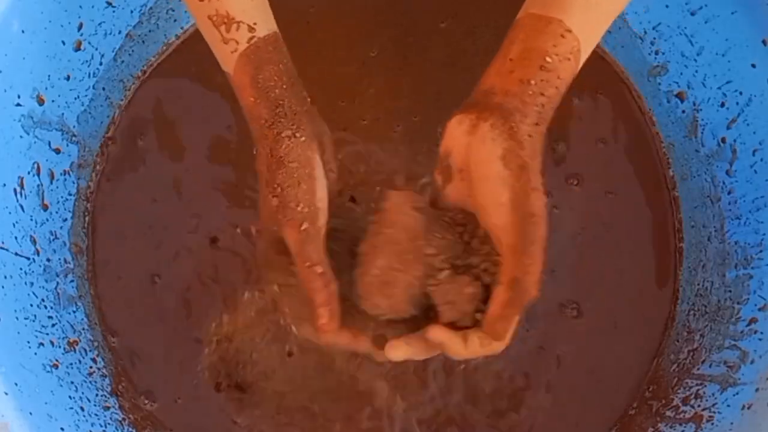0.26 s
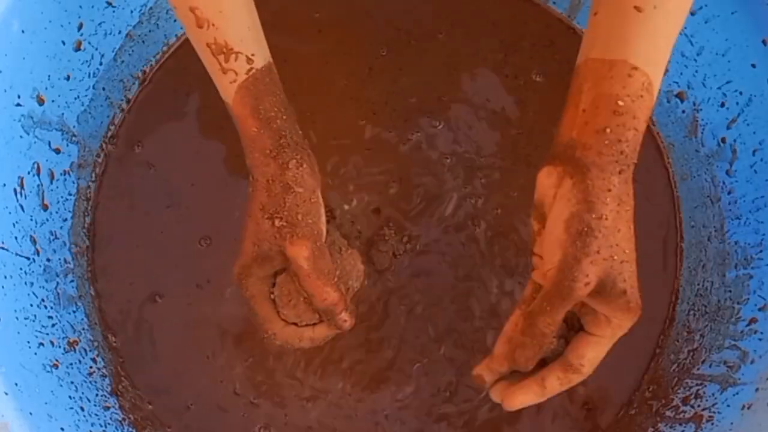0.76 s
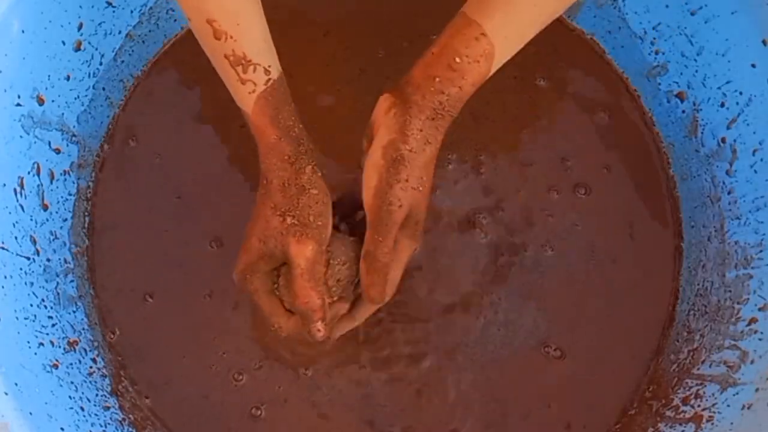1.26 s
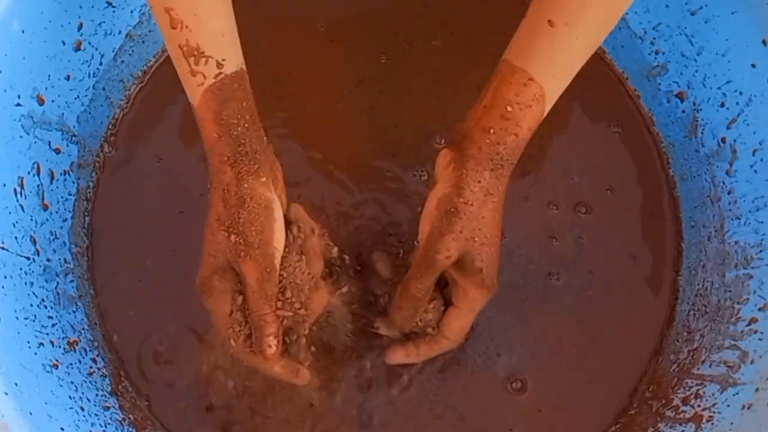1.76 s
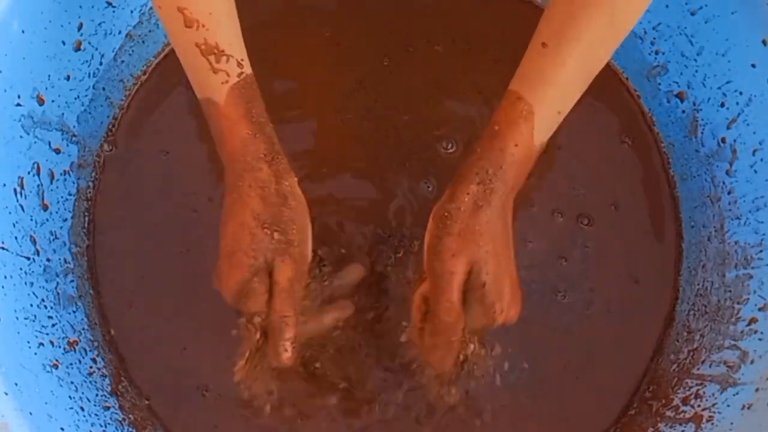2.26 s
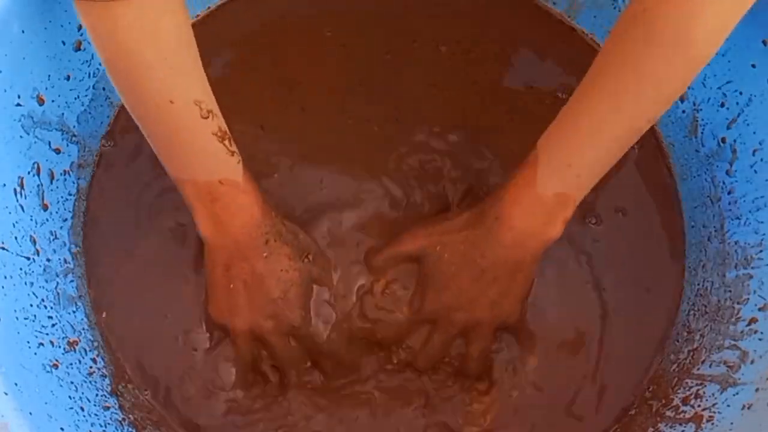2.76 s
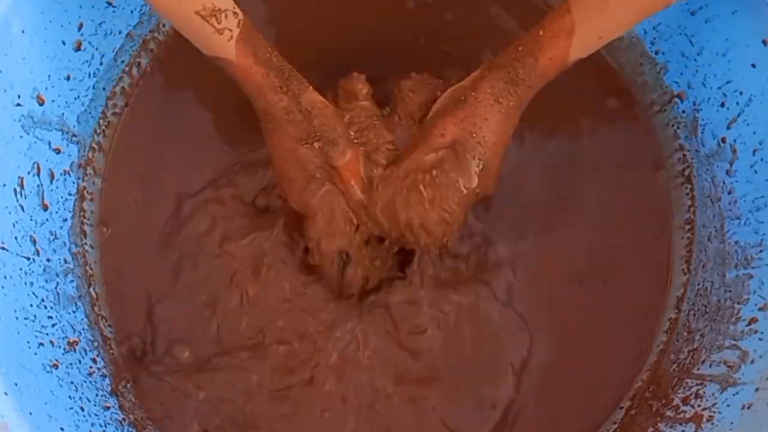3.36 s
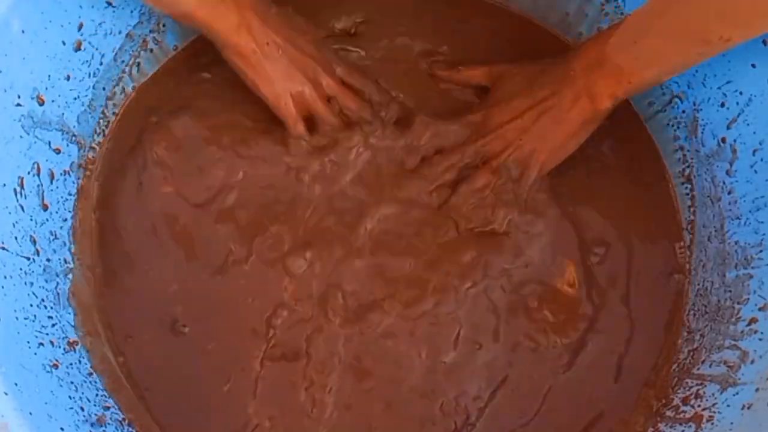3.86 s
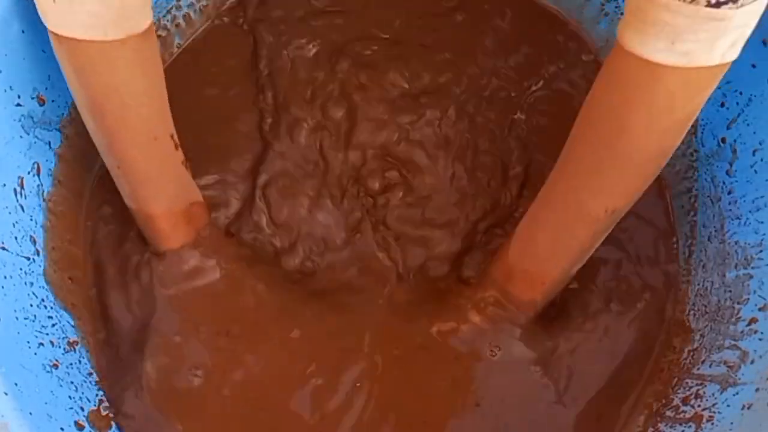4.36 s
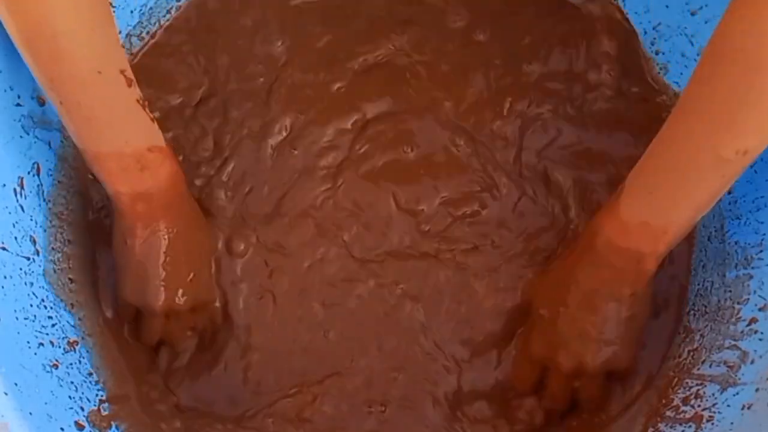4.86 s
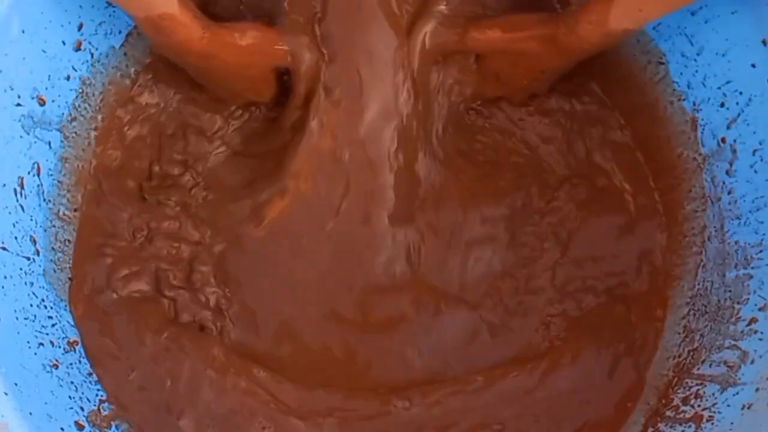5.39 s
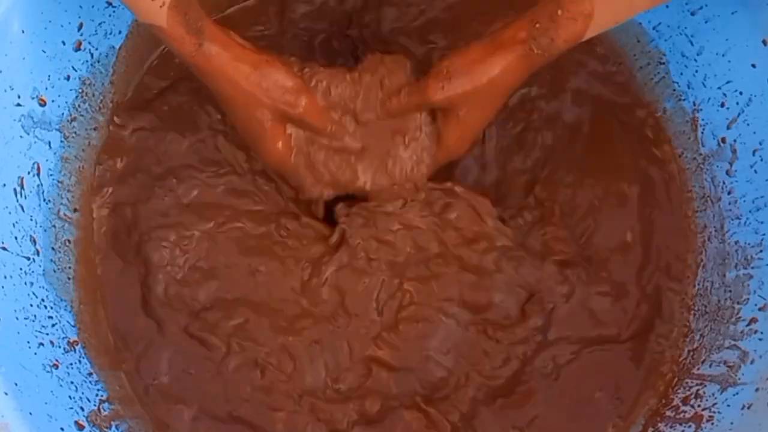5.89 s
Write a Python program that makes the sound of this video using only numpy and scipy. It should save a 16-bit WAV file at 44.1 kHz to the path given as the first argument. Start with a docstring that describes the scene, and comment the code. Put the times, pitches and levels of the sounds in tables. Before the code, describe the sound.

Sparse wet crackling and tiny droplets plopping come first, dry and near to the microphone, over faint low room rumble. A muddy swish grows into a short bubbling surge as hands scoop, then squelchy squirts and drips. Next comes a broad, heavy slosh with low rubbing on the basin floor and sandy scraping up the wall. It ends in thick gurgling splashes, spray and crunchy squeezed grit.

```python
"""Wet grit crackles and crumbs plop as hands crumble soaked clay over a basin of muddy water, close by.
The hands rake the sediment along the bottom, lift and squeeze a handful, rake again and pour slurry back.
Water is made of ringing air pockets, grit of tiny noise bursts, the basin of damped resonances;
movements shape their levels. A quiet room rumbles behind and answers faintly."""
import sys
import numpy as np
from scipy import signal
from scipy.fft import rfft, irfft, next_fast_len
from scipy.io import wavfile
from scipy.ndimage import map_coordinates

SR = 44100
rng = np.random.default_rng(int(sys.argv[2]) if len(sys.argv) > 2 else 0)


def output_pcm(signal):
    """Save a mono or channel-first signal as 16-bit PCM at the path in sys.argv[1].

    Samples are clipped to [-1, 1] before scaling.
    """
    pcm = np.clip(np.atleast_2d(signal).T, -1, 1) * 32767
    wavfile.write(sys.argv[1], SR, np.round(pcm).astype(np.int16))


N = 270333  # length in samples
TOP_HZ = 15900  # band limit

# spread of pitches of the small air pockets under crumbs and froth: (frequency [Hz], relative level [dB])
CRUMB_PITCHES = [(500, -9), (1050, 0.5), (2100, -0.5), (3300, -3.5), (6000, -24)]
# spread of pitches of the larger gulped air pockets: (frequency [Hz], relative level [dB])
GURGLE_PITCHES = [(280, -5), (500, 0), (950, -1), (2300, -7.5), (4200, -21)]
# spectrum of wet grit: (frequency [Hz], relative level [dB])
GRIT_COLOUR = [(500, 2), (1500, 4.5), (3500, 4.5), (7500, 0), (13000, 3.5), (16000, -1)]


def amp(db):
    """Decibels to gain."""
    return 10 ** (np.asarray(db) / 20)


def unit(x):
    """Scale to rms 1."""
    return x / np.sqrt(np.mean(x ** 2) + 1e-20)


def along(points, hz):
    """Join (Hz, dB) points on a log axis, falling another 20 dB an octave outside them."""
    point_hz, db = np.transpose(points)
    octave, known = np.log2(hz + 1), np.log2(point_hz)
    outside = np.abs(octave - np.clip(octave, known[0], known[-1]))
    return np.interp(octave, known, db) - 20 * outside


def wobble(rate):
    """A random curve of straight lines between knots, rate knots a second."""
    knots = rng.standard_normal(4096)
    return map_coordinates(knots, [np.arange(N) * rate / SR], order=1, mode="wrap")


def filtered(x, response):
    """Multiply the spectrum of x by a response of frequency."""
    m = next_fast_len(N + 8192)  # padded so that tails do not wrap round
    return irfft(rfft(x, m) * response(np.fft.rfftfreq(m, 1 / SR)), m)[:N]


def coloured(x, spectrum):
    """Filter x by the given spectrum and scale to rms 1."""
    return unit(filtered(x, lambda hz: amp(along(spectrum, hz))))


def low_cut(x, hz):
    """Weaken what lies below hz."""
    return signal.sosfilt(signal.butter(2, hz, "highpass", fs=SR, output="sos"), x)


def add(track, s, sound):
    """Mix a sound into the track at time s."""
    start = int(np.clip(round(s * SR), 0, N - 1))
    track[start:start + len(sound)] += sound[:N - start]


def scattered(when, sounds):
    """Sum short sounds that start at the given shares of the scene."""
    samples = (when * N).astype(int) + np.arange(sounds.shape[1])
    return np.bincount(samples.ravel(), sounds.ravel(), N)[:N]


def gestures(rows, attack_s, release_s, growth_db=0):
    """Each movement sets in, holds while it grows by growth_db a second, then dies away."""
    t, power = np.arange(N) / SR, np.zeros(N)
    for s, length, db in rows:
        age = np.maximum(t - s, 0)
        held = np.minimum(age, length)
        attack = 1 - np.exp(-age / attack_s)
        release = np.exp((held - age) / release_s)
        power += (amp(db + growth_db * held) * attack * release) ** 2
    return np.sqrt(power)


def swell(peak_s, db, rise_s, fall_s):
    """A bell of gain with its own rise and fall."""
    t = np.arange(N) / SR - peak_s
    return amp(db) * np.exp(-(t / np.where(t < 0, rise_s, fall_s)) ** 2)


def swells(rows):
    """Several bells of gain, summed in power."""
    return np.sqrt(sum(swell(*row) ** 2 for row in rows))


def crackle(count, size_db, clump_db, clump_rate, blur_db):
    """Tiny bursts of uneven size and colour, in clumps, over the blur of countless smaller ones."""
    decay_s, tint_db = 0.00043, 6  # life of a burst; how far it favours its own bands
    when, size, tint = rng.random((count, 3)).T[:, :, None]
    k = np.arange(SR // 900)
    bursts = rfft(np.exp(-k / SR / decay_s) * rng.standard_normal((count, len(k))))
    band = np.sqrt(np.linspace(0, 2, bursts.shape[1]))
    level_db = tint_db * np.cos(2 * np.pi * (band + tint)) - size_db * np.log(size + .015)
    grains = scattered(when, irfft(bursts * amp(level_db), len(k)))
    blur = amp(blur_db) * rng.standard_normal(N)
    return (unit(grains) + blur) * amp(clump_db * wobble(clump_rate))


def pocket(t, hz, cycles, rise, onset):
    """An air pocket swells over onset cycles and rings for a few more; its pitch rises as it nears the surface."""
    age = t * hz / cycles  # in decay times
    attack = 1 - np.exp(-t * hz / onset)
    ringing = np.sin(2 * np.pi * hz * t * (1 + rise * np.minimum(age, 10) / 2))
    return attack * np.exp(-age) * ringing


def bubbles(spectrum, count, cycles, rise, size_db):
    """A stream of ringing air pockets whose pitches are spread as the spectrum says, at rms 1."""
    when, pick, size, sign = rng.random((count, 4)).T[:, :, None]
    grid = np.arange(150, 8000)  # Hz
    share = np.cumsum(grid * amp(along(spectrum, grid)) ** 2)  # favours the small, high pockets
    hz = np.interp(pick, share / share[-1], grid)
    t = np.arange(SR // 70) / SR
    sizes = amp(-size_db * np.log(size + .04)) * np.sign(sign - .5)
    return unit(scattered(when, sizes * pocket(t, hz, cycles, rise, onset=0.26)))


def resonance(f, hz, width):
    """Response of one damped mode, 1 at its centre."""
    return 1j * f * width / (hz * hz - f * f + 1j * f * width)


def sloshed(x, response):
    """Crossfade x through three tunings of its resonances: their pitch wanders as the water sloshes."""
    shift, sloshes_per_s = .07, 9  # shift as a share of the pitch
    depth = np.clip(wobble(sloshes_per_s), -1, 1)
    total = np.zeros(N)
    for k in (-1, 0, 1):
        tuned = filtered(x, lambda f: response(f * (1 + shift) ** k))
        total += np.maximum(1 - np.abs(depth - k), 0) * tuned
    return unit(total)


def rumbling():
    """The steady noise of the quiet room."""
    # spectrum of the room noise: (frequency [Hz], relative level [dB])
    room_colour = [(25, -6), (65, 5.5), (140, 9.5), (300, -1.5), (800, -12.5), (3000, -23), (8000, -27.5),
                   (13000, -25.5)]
    return amp(-47) * coloured(rng.standard_normal(N), room_colour)


def room(x):
    """The faint, short answer of the room: a decaying noise tail, drawn afresh every eighth of a second."""
    t, wet, hop = np.arange(SR // 5) / SR, np.zeros(N), SR // 8
    for start in range(0, N, hop):
        tail = rng.standard_normal(len(t)) * amp(-60 * t / 0.081) * (t > .003)
        tail /= np.linalg.norm(tail)
        add(wet, start / SR, signal.fftconvolve(x[start:start + hop], tail))
    return filtered(wet, lambda hz: 1 / (1 + 1j * hz / 4000))  # duller above 4 kHz


def hollow(x):
    """Standing waves in the air over the water boost or thin their own bands."""
    # modes of the air in the basin: (frequency [Hz], width [Hz], gain at the centre [dB])
    air_modes = [(215, 62, -3.5), (484, 62, 1.5), (627, 136, -6), (860, 120, 1)]

    def response(f):
        return np.prod([1 + (amp(db) - 1) * resonance(f, hz, width) for hz, width, db in air_modes], axis=0)
    return filtered(x, response)


def scraping():
    """Hands dragged up the side ring the thinner wall; sand hisses through the shallow water."""
    # sand caught between hand and wall: (peak time [s], relative level [dB], rise [s], fall [s])
    sand_rubs = [(3.535, -38, 0.14, 0.04), (4.945, -34, 0.079, 0.033), (5.075, -32, 0.091, 0.087),
                 (5.15, -41.5, .65, 0.38)]
    # spectrum of the sand's hiss: (frequency [Hz], relative level [dB])
    scrape_colour = [(800, -9), (1500, 8), (4500, 3.5), (7500, 0), (11000, -9), (16000, -14)]
    rub = crackle(count=12000, size_db=1, clump_db=1.5, clump_rate=98, blur_db=-1.5)
    wall = sloshed(rub, lambda f: resonance(f, hz=930, width=420) ** 2)
    ring = swell(peak_s=5, db=-32, rise_s=0.32, fall_s=1) * wall
    hiss = swells(sand_rubs) * coloured(rub, scrape_colour)
    return ring + amp(2.5) * hiss


def raking():
    """Sediment rubbed along the bottom drums the basin; under the palms the whole floor thrums."""
    # hands and lumps rub on the bottom: (peak time [s], level [dB], rise [s], fall [s])
    bottom_rubs = [(.575, -41.5, 0.059, .055), (2.28, -44, 0.045, 0.037), (2.49, -37, 0.041, 0.76),
                   (3.32, -36, 0.11, 0.1), (4.08, -42, 0.16, .17), (4.52, -35.5, 0.11, 0.16),
                   (4.8, -31.5, 0.18, 0.76)]
    # the bottom of the water-filled basin: (frequency [Hz], width [Hz], relative level [dB])
    basin_modes = [(165, 84, -10), (267, 150, -3.5), (492, 138, 2.5), (763, 336, -4)]
    # spectrum of the floor's thrum: (frequency [Hz], relative level [dB])
    thrum_colour = [(60, -9), (140, 0.5), (300, -1), (450, -7)]

    def bottom(f):  # neighbouring modes have opposite signs
        return sum((-1) ** k * amp(db) * resonance(f, hz, width)
                   for k, (hz, width, db) in enumerate(basin_modes))
    rub = crackle(count=6000, size_db=1.5, clump_db=0.6, clump_rate=54, blur_db=-3)
    drumming = sloshed(rub, bottom)
    pressure = swells(bottom_rubs)
    uneven = amp(1 * wobble(14))  # the sediment gives way unevenly
    press = swell(peak_s=5, db=-40, rise_s=0.12, fall_s=0.75)  # the palms bear down
    thrum = coloured(crackle(count=2000, size_db=1.5, clump_db=2, clump_rate=30, blur_db=-5), thrum_colour)
    return pressure * uneven * drumming + press * thrum


def churning():
    """The wave pushed ahead of the wrists folds in large pockets of air, each with its own pitch."""
    wave = swell(peak_s=4.9, db=-33.5, rise_s=0.51, fall_s=0.74)
    return wave * bubbles(GURGLE_PITCHES, count=2400, cycles=4.2, rise=.06, size_db=2.5)


def lifting():
    """Gain of the rush under the rising handful: it swells, then stops as the handful clears the surface."""
    clear_s, release_s = 3.555, 0.031
    since_clear = np.maximum(np.arange(N) / SR - clear_s, 0)
    return swell(peak_s=3.375, db=-25, rise_s=0.1, fall_s=0.15) * np.exp(-since_clear / release_s)


def scooping():
    """Water closes under the rising handful in a dense rush of like-sized bubbles."""
    # spread of pitches of the air pockets: (frequency [Hz], relative level [dB])
    handful_pitches = [(450, -10), (950, -0.5), (1500, -0.5), (2400, -11.5)]
    return lifting() * bubbles(handful_pitches, count=5000, cycles=3.6, rise=.06, size_db=2.5)


def stirring():
    """Silt swishes past the fingers, ever grittier as they gather it; churned water starts to bubble."""
    # the hands sweep through the sediment: (start [s], length [s], relative level at the start [dB])
    strokes = [(2.44, 1.0, -43), (3.925, 0.52, -46.5), (4.42, .25, -40.5), (4.65, 0.86, -38)]
    # spectrum of the silt's swish: (frequency [Hz], relative level [dB])
    swish_colour = [(300, -8), (1000, 2.5), (1600, -0.5), (3000, -9), (5500, -21.5)]
    attack_s, release_s = .025, 0.04
    lift = lifting()
    flow = gestures(strokes, attack_s, release_s, growth_db=4.5) + amp(-18) * lift
    grit = amp(-15.5) * gestures(strokes, attack_s, release_s, growth_db=10) + amp(-21.0) * lift
    silt = crackle(count=15000, size_db=2.0, clump_db=2.0, clump_rate=56, blur_db=-2.0)
    grains = crackle(count=12000, size_db=3, clump_db=1.5, clump_rate=130, blur_db=1)
    froth = bubbles(CRUMB_PITCHES, count=3500, cycles=2.6, rise=.04, size_db=2)
    aerated = np.interp(np.arange(N) / SR, [3.1, 3.6], [.05, .45])  # bubbles' share of the power
    water = np.sqrt(1 - aerated) * coloured(silt, swish_colour) + np.sqrt(aerated) * froth
    return amp(1.5) * flow * water + amp(3.0) * grit * coloured(grains, GRIT_COLOUR)


def pouring():
    """Ropes of slurry fall back and gulp down fewer, larger pockets of air; the spray lingers."""
    # slurry pours from the lifted hands: (start [s], length [s], relative level [dB])
    pours = [(5.52, 0.26, -28), (5.897, 0.024, -25.5), (5.99, 0.13, -33.5)]
    trickle = (pours[0][0], N / SR, -40)  # keeps running off the hands from the first pour on
    streams = pours + [trickle]
    gurgle = gestures(streams, attack_s=0.0081, release_s=0.026)
    spray = gestures(streams, attack_s=0.043, release_s=0.043)
    water = bubbles(GURGLE_PITCHES, count=2800, cycles=3.2, rise=.06, size_db=3.2)
    grains = crackle(count=12000, size_db=-0.5, clump_db=2.5, clump_rate=85, blur_db=-3)
    return amp(-.6) * gurgle * low_cut(water, hz=343) + amp(-8.0) * spray * coloured(grains, GRIT_COLOUR)


def squirting():
    """Mud squirts between the fingers in short, dense spurts of grit."""
    # bell-shaped spurts: (start [s], relative level [dB], length [s])
    squirts = [(1.238, -35.5, 0.036), (3.521, -35, .02), (3.658, -32, 0.01), (3.831, -34, 0.019)]
    t = np.arange(N) / SR
    spurts = sum(amp(db) * np.exp(-(2 * (t - s) / length - 1) ** 2) for s, db, length in squirts)
    grains = crackle(count=14000, size_db=2, clump_db=1.5, clump_rate=300, blur_db=-2)
    return amp(1) * spurts * coloured(grains, GRIT_COLOUR)


def crunching():
    """A piece of the block gives way in a tight run of tiny fractures."""
    # pieces give way: (start [s], length [s], level [dB])
    crunches = [(.042, 0.019, -38), (.17, 0.013, -31), (.366, 0.06, -45), (.688, 0.0069, -29.5),
                (1.244, 0.028, -35.5), (2.362, 0.044, -34), (3.929, 0.016, -35.5), (6.116, 0.0055, -22)]
    # spectrum of the fractures: (frequency [Hz], relative level [dB])
    crunch_colour = [(300, -6), (1200, -1), (2300, 0), (7000, -13.5), (14000, -23)]
    fractures = crackle(count=7000, size_db=3, clump_db=2.5, clump_rate=400, blur_db=-12)
    return gestures(crunches, attack_s=0.0022, release_s=0.0075) * coloured(fractures, crunch_colour)


def splashes(events, cycles, spray_db, spray_t60, echo_db, echo_t60):
    """Pockets open with a tick of spray, shed a smaller one and rebound between hands and basin wall."""
    track, t = np.zeros(N), np.arange(SR // 16) / SR
    for s, db, hz in events:
        spray, scatter = rng.standard_normal((2, len(t)))
        pole = np.exp(-2 * np.pi * 1.1 * hz / SR)
        spray = unit(signal.lfilter([1], [1, -pole], spray))  # big pockets spit duller
        life = np.interp(s, [0, N / SR], cycles)  # decay in cycles, gliding from first to last
        life = life * min(1, hz / 1100)  # the largest ones collapse in a dull slap
        tone = pocket(t, hz, life, rise=.035, onset=.08)
        small_hz = min(hz * (2 + rng.random() / 2), TOP_HZ)
        satellite = amp(-7) * pocket(t, small_hz, life, rise=.02, onset=1)
        ring = tone + satellite + amp(spray_db - 60 * t / spray_t60) * spray
        walls = scatter * amp(-60 * t / echo_t60) * (t > .001)
        echo = signal.fftconvolve(ring, walls / np.linalg.norm(walls))[:len(t)]
        add(track, s, amp(db) * (ring + amp(echo_db) * echo))
    return track


def snapping():
    """Films of mud snap open: air pockets that die within a cycle or so."""
    # films snapping open: (time [s], relative level [dB], pitch [Hz])
    snaps = [(.2999, -6, 4000), (.6353, -10, 4770), (.7058, -8.5, 5100), (2.4583, 2, 6900),
             (3.492, -9, 12500), (3.8583, -6, 12500), (5.254, -4.5, 6200), (5.409, -11, 5030)]
    sound = splashes(snaps, cycles=(.8, .8), spray_db=-13.5, spray_t60=0.0079, echo_db=-16, echo_t60=0.037)
    return low_cut(sound, hz=1000)


def plopping():
    """Lumps and drops trap air pockets, which ring longer as thick mud gives way to loose water."""
    # trapped pockets: (time [s], relative level [dB], pitch [Hz])
    plops = [(.043, -24, 820), (.097, -22, 1360), (.107, -23, 1110), (.3, -12.5, 1020), (.565, -22.5, 1690),
             (.635, -23.5, 1710), (.706, -17.5, 500), (.707, -22, 920), (.841, -23, 1580),
             (.877, -25, 2600), (1.11, -22.5, 1450), (1.463, -25.5, 2280), (1.663, -19, 1580),
             (2.084, -26.5, 1020), (2.153, -29, 1500), (2.308, -25.5, 2030), (2.405, -26, 1120),
             (2.458, -19.5, 970), (3.368, -16.5, 3160), (3.431, -15.5, 515), (3.556, -15, 890),
             (3.614, -16, 3060), (3.622, -19, 3750), (3.722, -24.5, 3560), (3.893, -24.5, 1300),
             (3.936, -15.5, 665), (4.057, -17, 1510), (4.948, -17, 510), (5.166, -18, 1580),
             (5.526, -13.5, 480), (5.549, -11.5, 950), (5.626, -13.5, 1760), (5.649, -15, 640),
             (5.684, -16.5, 965), (5.721, -14, 2230), (5.786, -14.5, 1504), (5.819, -14, 1180),
             (5.907, -17, 590), (5.99, -16.5, 980), (6.022, -19, 1010), (6.047, -20, 1410),
             (6.087, -12, 2010), (6.123, -15, 830)]
    sound = splashes(plops, cycles=(2.0, 3.7), spray_db=-12.0, spray_t60=0.02, echo_db=-7.5, echo_t60=0.024)
    return low_cut(sound, hz=171)


def crumbling():
    """Crumbs patter into the water in clumps while the wet grit crackles between the fingers."""
    # the fingers close on wet clay: (start [s], length [s], relative level [dB])
    squeezes = [(-.03, .35, -39), (.358, 0.12, -39), (.518, 0.1, -44), (.598, .11, -42), (.73, .05, -46.5),
                (1.118, 0.051, -44.5), (1.228, 0.055, -45), (1.405, 0.11, -48), (1.605, 0.19, -50),
                (1.745, 0.14, -42.5), (1.895, 0.457, -46.5), (2.35, 0.067, -40), (3.485, 0.073, -36),
                (3.565, 0.12, -37.5), (3.832, 0.047, -39.5), (3.925, .19, -47), (5.8, 0.27, -41),
                (6.035, .095, -32)]
    holding = (0, 2.6, -53.5)  # the loose grip between squeezes works only the grit
    attack_s = 0.012
    # soaked clay also sheds and fizzes by itself, at a steady idle level
    patter = np.hypot(gestures(squeezes, attack_s, release_s=.022), amp(-57))
    grit = np.hypot(gestures(squeezes + [holding], attack_s, release_s=0.035), amp(-58))
    crumbs = bubbles(CRUMB_PITCHES, count=3600, cycles=2.2, rise=.03, size_db=4.7)
    grains = crackle(count=9000, size_db=3.2, clump_db=2.0, clump_rate=130, blur_db=-5)
    return amp(1) * patter * crumbs + grit * coloured(grains, GRIT_COLOUR)


def scene():
    """Clay, water and basin in the room, all coloured by the hollow of the basin."""
    clay = crumbling() + crunching() + squirting() + snapping()
    water = stirring() + churning() + scooping() + pouring() + plopping()
    near = clay + water + raking() + scraping()
    return hollow(near + amp(-14.0) * room(near) + rumbling())[None]


def record(dry):
    """The microphone loses the deep bass; nothing is kept above the band limit."""
    bass_cut = low_cut(dry, hz=78)
    return np.array([filtered(channel, lambda hz: hz < TOP_HZ) for channel in bass_cut])


dry = scene()
out = record(dry)
output_pcm(out)
```